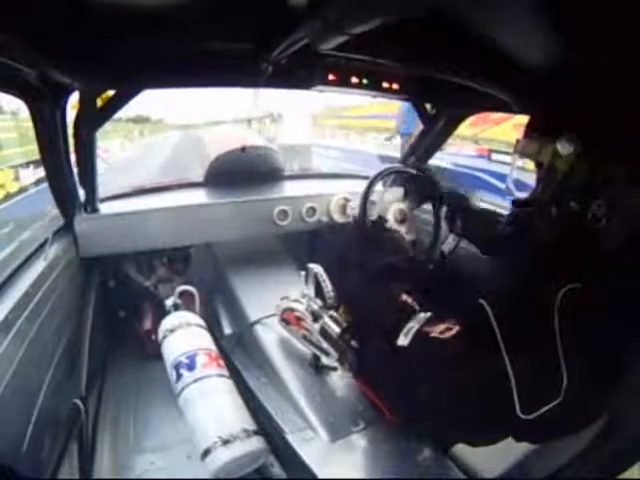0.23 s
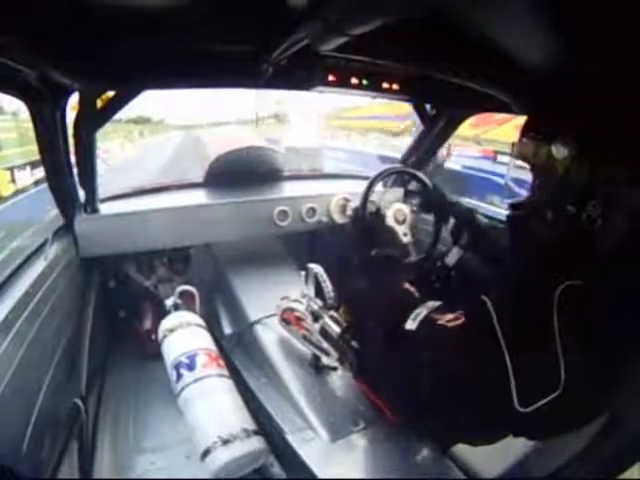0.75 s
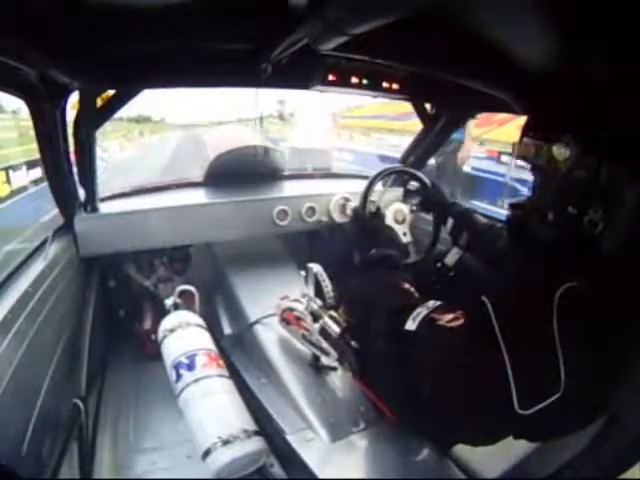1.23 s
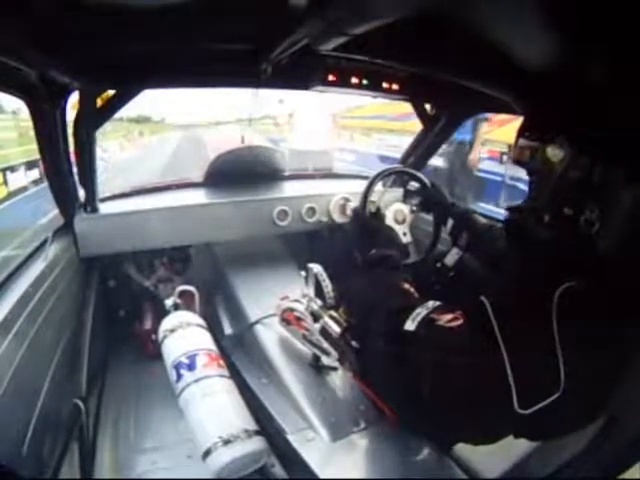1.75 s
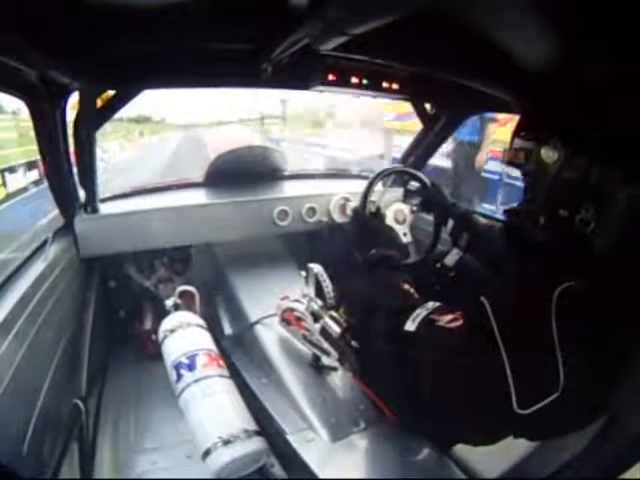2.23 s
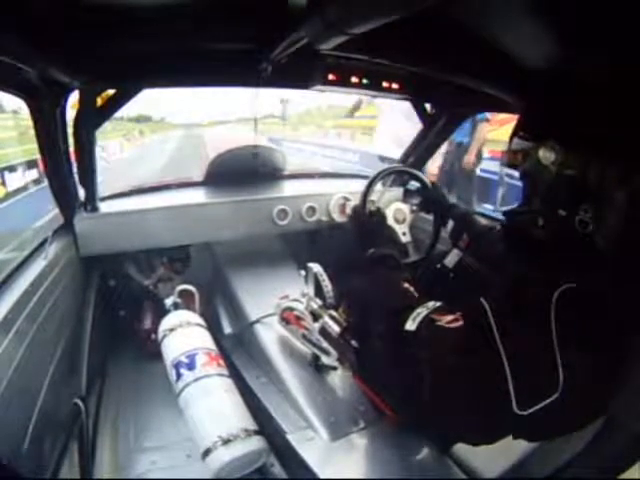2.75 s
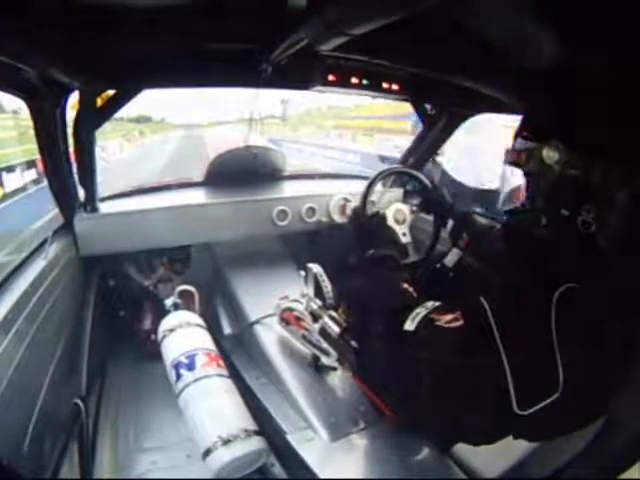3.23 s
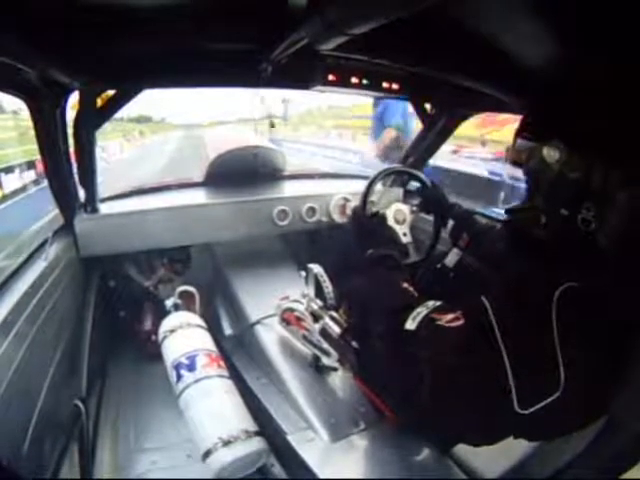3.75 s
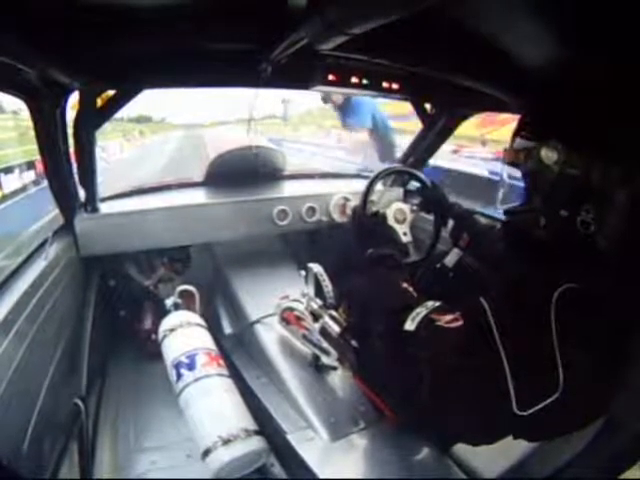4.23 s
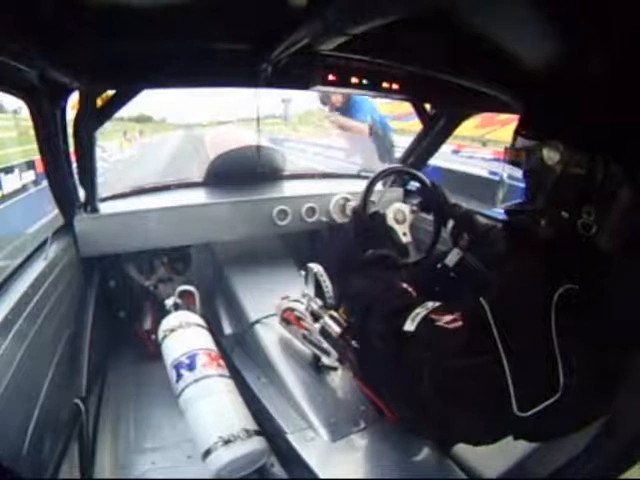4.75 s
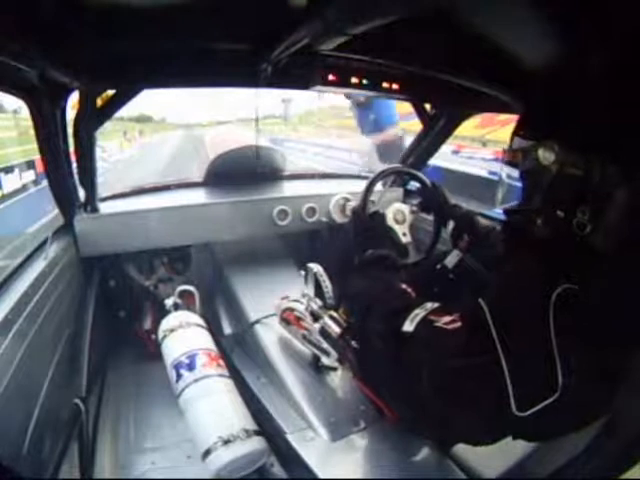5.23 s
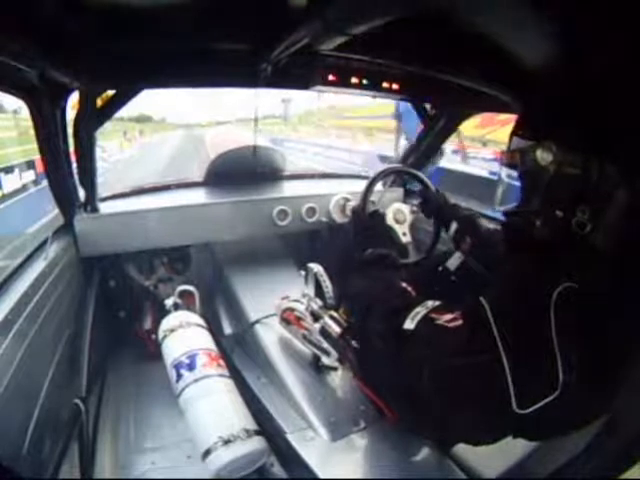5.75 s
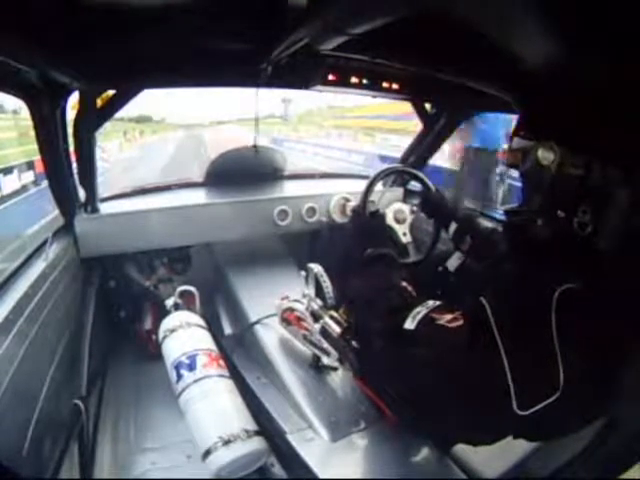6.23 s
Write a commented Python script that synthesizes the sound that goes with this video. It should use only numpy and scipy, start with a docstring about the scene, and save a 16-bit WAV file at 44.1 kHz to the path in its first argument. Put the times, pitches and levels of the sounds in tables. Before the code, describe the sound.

A powerful race engine idles unevenly inside a bare metal cockpit, its deep boom stumbling and surging in short throttle blips, with raspy exhaust and buzzing panels.

```python
"""A supercharged V8 drag car idles at the start line, heard from inside its bare cockpit.
At once a near-pure boom at the firing rate and a cabin drone sound under exhaust bark, roar, rasp and panel buzz.
The idle surges irregularly while the boom stumbles; a loose metal tick snaps at 0.29 s.
The speed sinks lowest near 5.7 s, then recovers into two last surges.
Throughout, a slow sample-and-hold mirrors the boom into a thin high whine."""
import sys
import numpy as np
from scipy import signal
from scipy.fft import rfft, irfft, next_fast_len
from scipy.io import wavfile
from scipy.ndimage import uniform_filter1d, map_coordinates

SR = 44100
rng = np.random.default_rng(int(sys.argv[2]) if len(sys.argv) > 2 else 0)


def int16_out(signal):
    """Quantize to a 16-bit WAV file."""
    q = np.round(np.clip(np.atleast_2d(signal).T, -1, 1) * 32767)
    wavfile.write(sys.argv[1], SR, q.astype(np.int16))


N = 286209

# long or deep sags of the boom: [t/s, share of amplitude lost/0-1, time from centre to 1/e of the sag/s]
STUMBLES = [(0.122, 0.5, 0.036), (0.501, 0.86, 0.084), (0.642, 0.86, 0.088), (0.76, 0.58, 0.023),
            (1.078, 0.63, 0.023), (1.259, 0.9, 0.071), (1.424, 0.58, 0.028), (1.506, 0.76, 0.014),
            (1.753, 0.73, 0.036), (1.848, 0.59, 0.031), (1.986, 0.73, 0.028), (2.16, 0.67, 0.13),
            (2.406, 0.71, 0.034), (2.698, 0.54, 0.026), (2.972, 0.82, 0.081), (3.084, 0.88, 0.046),
            (3.214, 0.73, 0.013), (3.378, 0.98, 0.012), (3.674, 1, 0.018), (3.746, 0.97, 0.044),
            (3.869, 0.92, 0.018), (4.274, 0.62, 0.039), (4.504, 0.64, 0.051), (4.631, 0.82, 0.011),
            (4.86, 0.62, 0.035), (5.151, 1, 0.022), (5.287, 0.92, 0.027), (5.486, 0.63, 0.041),
            (5.664, .72, 0.025), (6.044, 0.91, 0.035), (6.23, 1, 0.054)]
# relative strength of the eight cylinders in firing order: [amplitude/ratio]
CYLINDERS = [0.99, 0.63, 0.93, 0.92, 0.86, 1.46, 0.59, 0.87]


def amp(db):
    """Decibels to gain."""
    return 10 ** (np.asarray(db) / 20)


def unit(x):
    """Scale to rms 1."""
    return x / np.sqrt(np.mean(x ** 2) + 1e-20)


def curves(rows):
    """One value per sample for each column after the time."""
    s, *cols = np.transpose(rows)
    t = np.arange(N) / SR
    return [np.interp(t, s, c) for c in cols]


def wobble(rate):
    """A smooth random curve with rate knots a second."""
    knots = rng.standard_normal(int(N * rate / SR) + 4)
    return map_coordinates(knots, [np.arange(N) * rate / SR])


def filtered(x, response):
    """Shape x with a complex response given as a function of frequency in Hz."""
    m = next_fast_len(N + SR // 2)
    spectrum = rfft(x, m) * response(np.fft.rfftfreq(m, 1 / SR))
    return irfft(spectrum, m)[..., :N]


def resonance(hz, centre, width):
    """Complex response of one damped mode, 1 at its centre."""
    return 1j * hz * width / (centre ** 2 - hz ** 2 + 1j * hz * width)


def cabin(x, spectrum):
    """Colour x with a broad spectrum and let the panels ring on top of it; rms 1."""
    # ringing sheet metal and cabin air: [f/Hz, width/Hz, lift/dB]
    panel_modes = [(273.7, 10.8, 8.5), (485.4, 18, 5.5), (830, 43, 6), (2526, 135, 8.5)]
    f, db = np.transpose(spectrum)

    def response(hz):
        broad = amp(np.interp(np.log(hz + 1), np.log(f), db))
        ring = 1 + sum((amp(lift) - 1) * resonance(hz, c, w) for c, w, lift in panel_modes)
        return broad * ring

    return unit(filtered(x, response))


def steady(x, seconds):
    """Even out swells slower than the given time."""
    power = np.abs(uniform_filter1d(x ** 2, int(seconds * SR)))
    return x / np.sqrt(power + 1e-4)


def firings(turns, scatter_db, jitter):
    """One pulse per whole turn, sized by its cylinder and by chance, jitter seconds early or late."""
    at = np.flatnonzero(np.diff(np.floor(turns)) > 0)
    chance = rng.standard_normal((len(at), 2))
    size = np.resize(CYLINDERS, len(at)) * amp(scatter_db * chance[:, 0])
    moved = np.clip(at + jitter * SR * chance[:, 1], 0, N - 1).astype(int)
    return np.bincount(moved, size, N)


def puffs(pulses, t60):
    """Each pulse releases a burst of turbulence that dies by 60 dB in t60 seconds; rms 1."""
    t = np.arange(SR // 8) / SR
    envelope = signal.fftconvolve(pulses, amp(-60 * t / t60))[:N]
    return unit(envelope * rng.standard_normal(N))


def engine():
    """Surges raise the effort at once while the flywheel's inertia makes the speed trail behind.

    Returns effort (dB over idle), turns (firings counted so far) and the boom's idle level (dB)."""
    # the idle between surges: [t/s, firing rate/Hz, boom level before effort and cabin uptake/dB, effort/dB]
    idle_course = [(0, 78.04, -14.5, -1), (.3, 77.3, -13.5, -1), (.8, 80, -13.5, -.5), (1.6, 78.74, -12, 0),
                   (2.1, 79.15, -13.5, 0), (2.55, 77.75, -13.5, -.5), (3.35, 79.75, -14, -0.1),
                   (3.95, 80.5, -14.5, 1.5), (4.3, 80.46, -13, 1), (4.58, 78.5, -12.5, 0.5),
                   (4.66, 73.35, -18.5, -2), (5.2, 75.88, -15.5, -1.5), (5.42, 70.76, -18.5, -2),
                   (5.69, 63.84, -17, -6), (5.75, 68.04, -15, -0.7), (5.9, 77.95, -16, -0.5),
                   (6.3, 80.6, -15, -0.5)]
    # throttle surges: [start t/s, rise/s, hold/s, fall/s, firing rate the speed heads up by/Hz, effort/dB]
    surge_events = [(.23, .11, .27, .15, 22, 6.6), (.76, .04, .08, .06, 3, 2.5),
                    (.97, .13, .23, .14, 21, 5.3), (1.6, .08, .06, .08, 9, 3.5),
                    (1.86, .11, .26, .22, 22, 5.5), (2.54, .27, .22, .2, 21, 5.4),
                    (3.23, .04, .08, .06, 4, 1.7), (3.5, .06, .14, .12, 20, 6),
                    (4.34, .1, .14, .05, 20, 3.6), (5.71, .17, .19, .2, 22, 5.7),
                    (6.32, .09, .15, .2, 20, 6.5)]
    flywheel_s = .07  # time constant
    t = np.arange(N) / SR
    idle_hz, boom_db, effort = curves(idle_course)
    pull_hz = np.zeros(N)
    for start, rise, hold, fall, gained_hz, db in surge_events:
        surge = np.interp(t, np.cumsum([start, rise, hold, fall]), [0, 1, 1, 0])
        effort = effort + db * surge
        pull_hz += gained_hz * surge
    step = 1 / (flywheel_s * SR)
    speed_hz = idle_hz + signal.lfilter([step], [1, step - 1], pull_hz)
    return effort, np.cumsum(speed_hz) / SR, boom_db


def misfires(turns):
    """Chance misfires in most engine cycles away from the stumbles: rows like those of STUMBLES."""
    chance_per_cycle, mean_loss, mean_half_s = .95, .57, .011
    recovery_s = .05  # none falls this close to a stumble's centre
    place, happens, depth, length = rng.random(size=(100, 4)).T
    firing_number = (np.arange(len(place)) + place) * len(CYLINDERS)
    at = np.interp(firing_number, turns, np.arange(N) / SR, right=np.inf)
    clear = np.abs(at[:, None] - np.array(STUMBLES)[:, 0]).min(axis=1) > recovery_s
    rows = np.column_stack([at, mean_loss * (.5 + depth), mean_half_s * (.5 + length)])
    return rows[(happens < chance_per_cycle) & clear & np.isfinite(at)].tolist()


def boom(turns, boom_db):
    """The closed cabin swells the firing rate into a near-pure tone that sags and slips in phase at stumbles."""
    # how strongly the cabin takes up the firing tone: [f/Hz, gain/dB]
    uptake_curve = [(38, -8), (60, -5), (72, 0.5), (81, -0.5), (89, -1.5), (97, 0.5), (108, 5.5), (135, -6),
                    (200, 7)]
    slip_rad = 0.57  # standard deviation of the phase slip after a full stumble
    t = np.arange(N) / SR
    level = amp(boom_db + .9 * wobble(35))
    slips = np.zeros(N)
    sags = STUMBLES + misfires(turns)
    for (s, lost, half), chance in zip(sags, rng.standard_normal(size=150)):
        near = slice(max(int((s - .25) * SR), 0), int((s + .25) * SR))
        sag = np.exp(-((t[near] - s) / half) ** 2)
        level[near] *= 1 - np.clip(lost, 0, 1) * sag
        slips[near] += slip_rad * chance * lost ** 2 * sag / np.sum(sag)
    phase = 2 * np.pi * turns + np.cumsum(slips) + 0.28 * wobble(35)  # the crank turns unevenly
    firing_tone = level * np.sqrt(2) * np.sin(phase)
    taken_up = filtered(firing_tone, lambda hz: amp(np.interp(hz, *np.transpose(uptake_curve))))
    octave = amp(-32.5) * level * np.sin(2 * phase)
    return taken_up + octave


def drone(turns):
    """Strong and weak firings keep the cabin's standing waves ringing at their own pitches."""
    # standing waves of the cabin air, each passed twice: [f/Hz, width of one pass/Hz, relative level/dB]
    air_modes = [(32, 5, -21), (51, 3.5, 0), (64, 6, -9), (81, 6, -9), (97, 6, -5)]
    # course of the low drone: [t/s, level before gain_db and swell/dB]
    drone_course = [(0, -30.0), (0.3, -27.5), (0.58, -25.0), (0.82, -35.5), (1.25, -31.5), (1.55, -37.0),
                    (1.85, -33.0), (2.3, -32.5), (2.6, -36.0), (3.1, -29.5), (3.5, -30.5), (3.88, -27.5),
                    (4.4, -37.0), (4.9, -29.5), (5.15, -33.5), (5.55, -28.0), (5.85, -32.0), (6.48, -29.0)]
    gain_db = 5
    blasts = firings(turns, scatter_db=8.5, jitter=0.0036)
    uneven = blasts - uniform_filter1d(blasts, SR // 20)
    modes = lambda hz: sum(amp(db) * resonance(hz, c, w) ** 2 for c, w, db in air_modes)
    ring = steady(unit(filtered(uneven, modes)), .15)
    swell_db = 1.5 * wobble(9)
    return amp(curves(drone_course)[0] + gain_db + swell_db) * ring


def exhaust(turns, effort):
    """Each firing is a pressure blast trailed by turbulence: a low bark and a throaty roar."""
    # colour of the low bark: [f/Hz, relative level/dB]
    bark_spectrum = [(45, -49), (75, -21.5), (110, 8), (150, 1.5), (200, -4), (245, -10.5), (320, -12.5),
                     (400, -17), (550, -33), (1500, -72)]
    # colour of the throaty roar: [f/Hz, relative level/dB]
    roar_spectrum = [(200, -60), (330, -1), (400, -1), (490, 0.5), (560, -3), (650, -4.5), (790, -6),
                     (950, -5), (1250, -4.5), (1600, -12.5), (3000, -57)]
    # levels at zero effort (dB) and their growth (dB per dB of effort)
    bark_db, bark_grows = -38, 1.03
    roar_db, roar_grows = -52, 1.11
    bark_blasts = firings(turns, scatter_db=2.5, jitter=0.0011)
    bark_mix = unit(bark_blasts) + 1.17 * puffs(bark_blasts, t60=0.14)
    bark = steady(cabin(bark_mix, bark_spectrum), .08)
    roar_blasts = firings(turns, scatter_db=2.5, jitter=0.00058)
    roar_mix = 0.26 * unit(roar_blasts) + puffs(roar_blasts, t60=0.18)
    roar = steady(cabin(roar_mix, roar_spectrum), 0.075)
    bark_gain = amp(bark_db + bark_grows * effort)
    roar_gain = amp(roar_db + roar_grows * effort + 1.6 * wobble(18))
    return bark_gain * bark + roar_gain * roar


def rasp(turns, effort):
    """Gas tears out of the open pipes at each firing, over the blower's rush and clattering valves and metal."""
    # colour of the rasp: [f/Hz, relative level/dB]
    rasp_spectrum = [(600, -23), (1200, -7.5), (1550, 3.5), (2200, 1), (2600, 0), (3200, 3), (3700, -0.5),
                     (4000, -4)]
    level_db, grows = -45, 0.86  # dB at zero effort, dB per dB of effort
    gas = puffs(firings(turns, scatter_db=5.8, jitter=.0006), t60=0.11)
    clatter = puffs(firings(2 * turns, scatter_db=5, jitter=.001), t60=0.036)  # two knocks per firing
    rush = rng.standard_normal(N)
    mix = steady(cabin(gas + amp(-3.6) * clatter + amp(0.5) * rush, rasp_spectrum), 0.07)
    lope = np.sin(2 * np.pi * turns / len(CYLINDERS))  # one swell for each full engine cycle
    return amp(level_db + grows * effort + 0.59 * lope + 1.62 * wobble(30)) * mix


def buzzes(effort):
    """Loose panels, as noise through modes, shake harder with effort, each coming and going by itself."""
    # buzzing panels, each mode passed twice: [f/Hz, width of one pass/Hz, level against level_db/dB]
    buzz_modes = [(285, 48, -9.5), (745, 38, -12), (875.7, 35, -13.5), (1025, 28, -16.5), (1562, 91, -15.5),
                  (1921, 77, -13), (2700, 83, -14.5)]
    level_db, grows = -50.5, 0.98  # dB at zero effort, dB per dB of effort
    out = np.zeros(N)
    for c, w, db in buzz_modes:
        ring = unit(filtered(rng.standard_normal(N), lambda hz: resonance(hz, c, w) ** 2))
        out += amp(level_db + grows * effort + db + 4.2 * wobble(16)) * ring
    return out


def ticks():
    """A loose fitting snaps against the bodywork: a fast-dying 3 kHz ping with noise."""
    # loose metal ticks: [t/s, starting level of the ping/dB]
    tick_events = [(.2922, -29)]
    t = np.arange(SR // 40) / SR
    out = np.zeros(N)
    for s, db in tick_events:
        ping = np.sin(2 * np.pi * 3000 * t)
        snap = amp(-60 * t / 0.015) * (ping + 0.92 * rng.standard_normal(len(t)))
        out[round(s * SR):][:len(t)] += amp(db) * snap
    return out


def scene():
    """The crankshaft times the engine's layers and its effort sets their levels; the bodywork answers."""
    effort, turns, boom_db = engine()
    effort = effort + .7 * wobble(16)  # no two cycles burn alike
    boom_grows = 0.33  # dB per dB of effort
    low = boom(turns, boom_db + boom_grows * effort) + drone(turns)
    return (low + exhaust(turns, effort) + rasp(turns, effort) + buzzes(effort) + ticks())[None]


def record(dry):
    """Slow sampling holds each value: the steps mirror the sound around multiples of the sampling rate."""
    sample_hz, top_hz = 8000, 12900  # rate of the held steps, final treble limit
    n = np.arange(N)
    smooth = filtered(dry[0], lambda hz: hz < sample_hz / 2)
    held_at = (n * sample_hz // SR) * SR / sample_hz
    held = np.interp(held_at, n, smooth)
    return filtered(held, lambda hz: hz < top_hz)[None]


dry = scene()
out = record(dry)
int16_out(out)
```